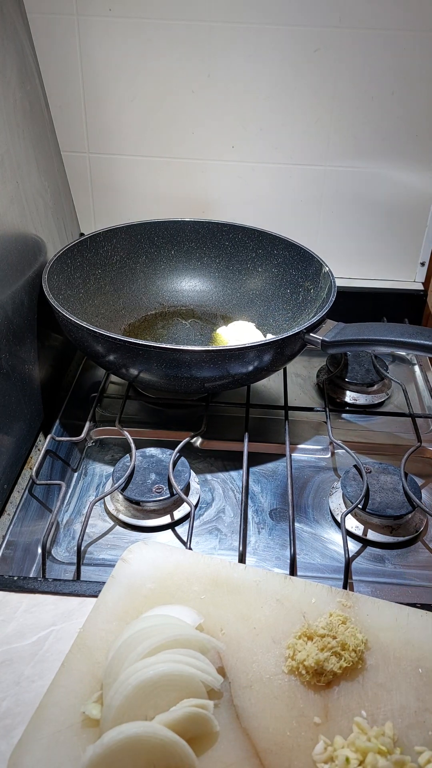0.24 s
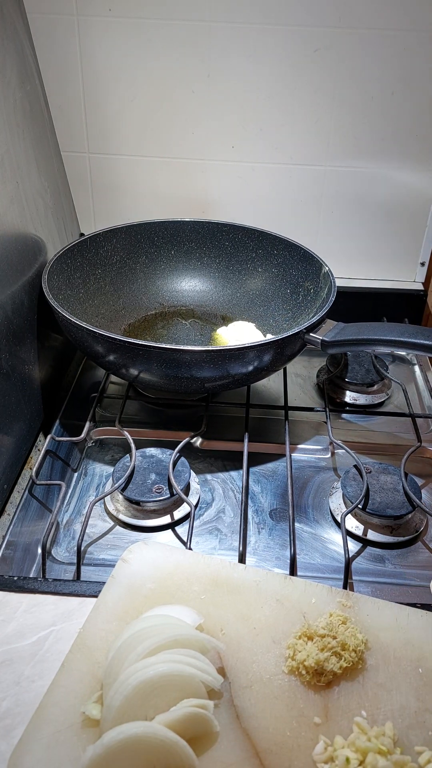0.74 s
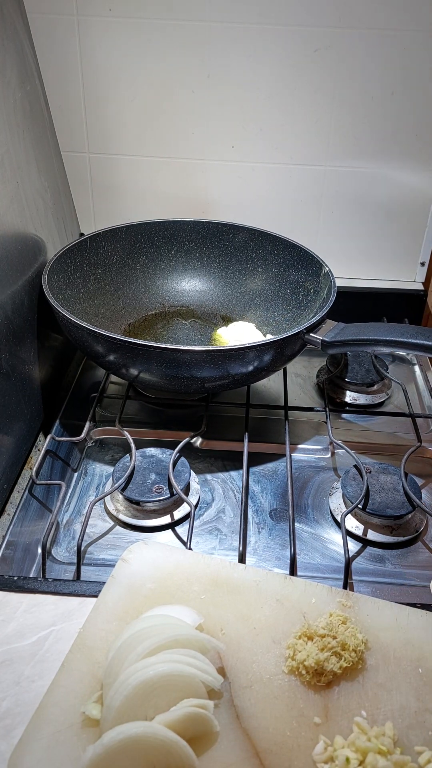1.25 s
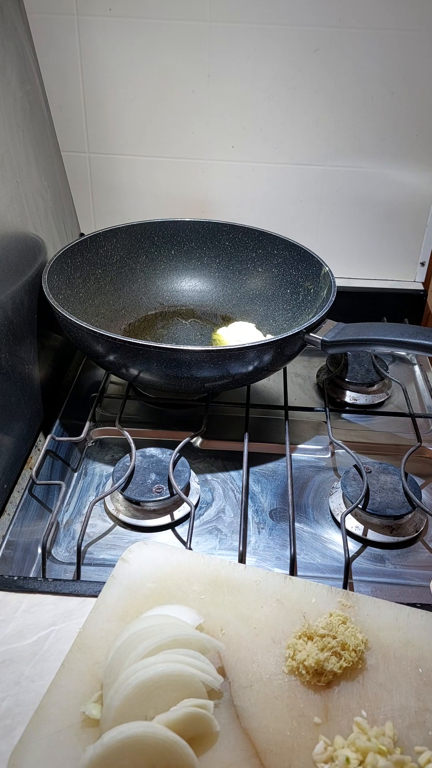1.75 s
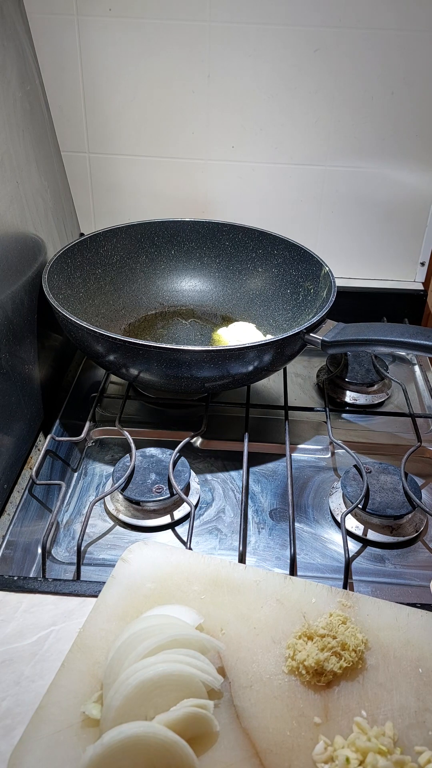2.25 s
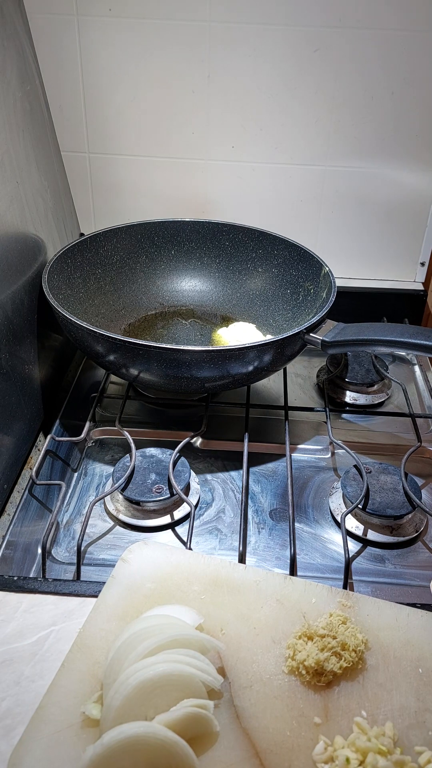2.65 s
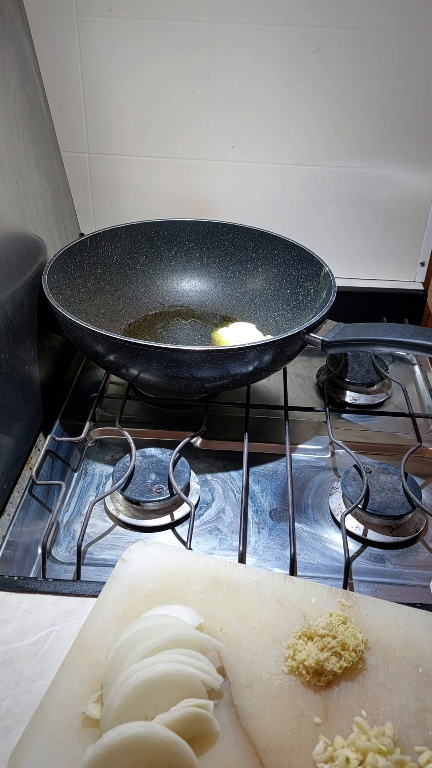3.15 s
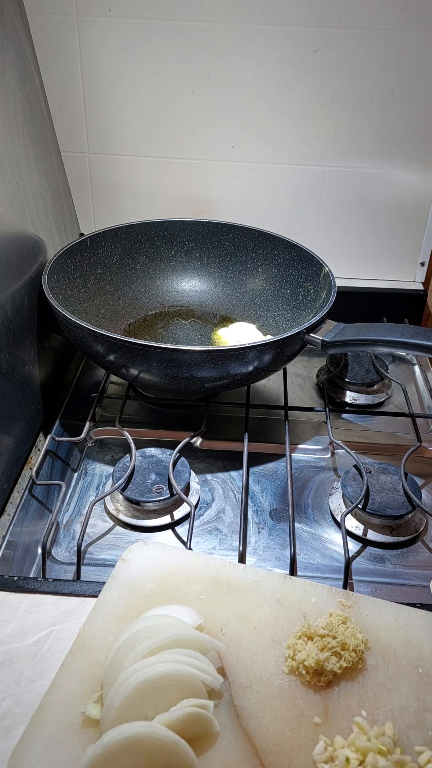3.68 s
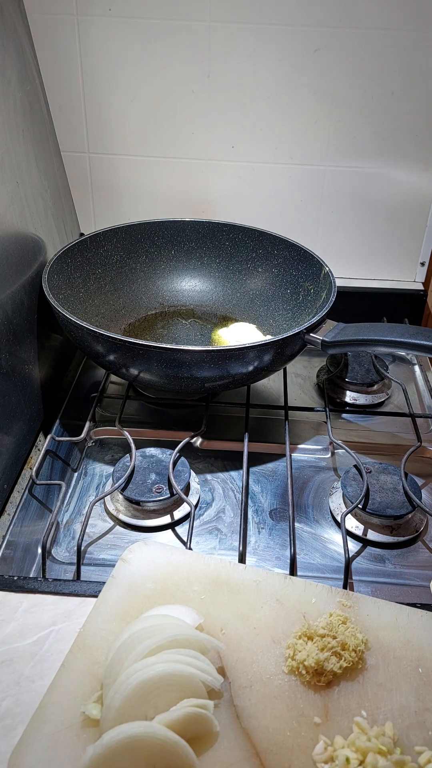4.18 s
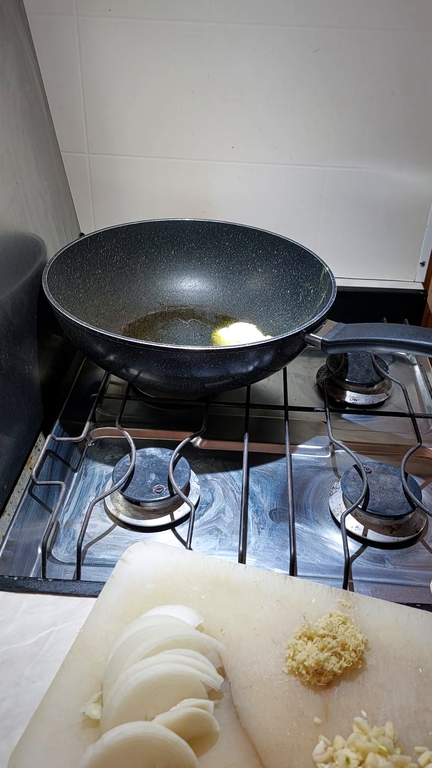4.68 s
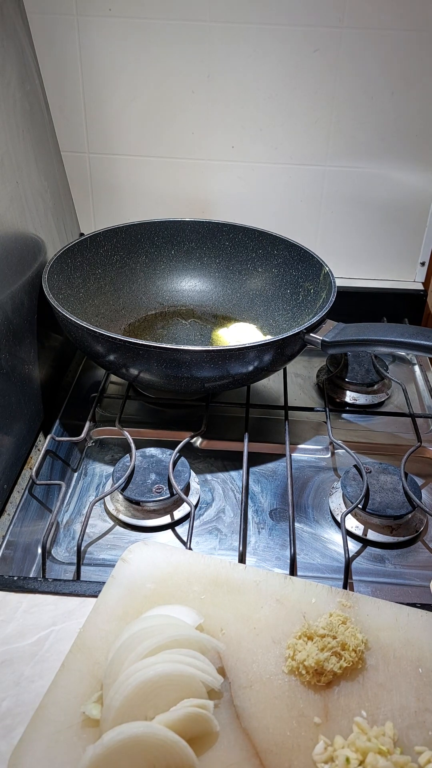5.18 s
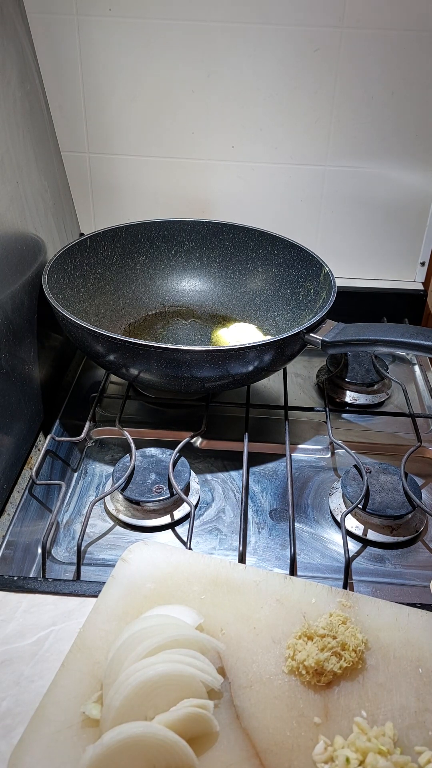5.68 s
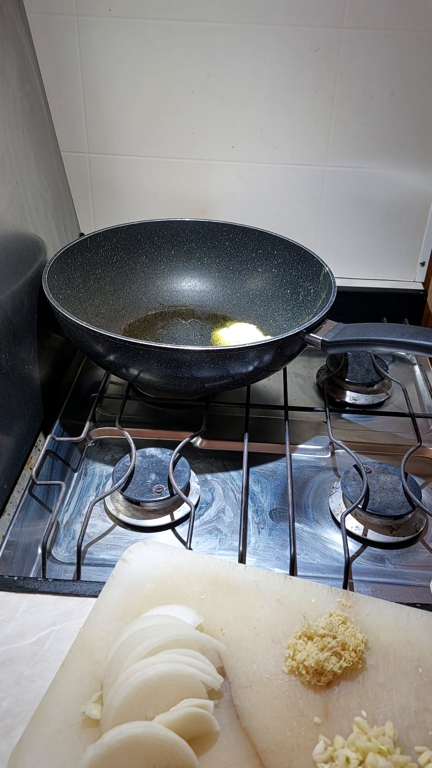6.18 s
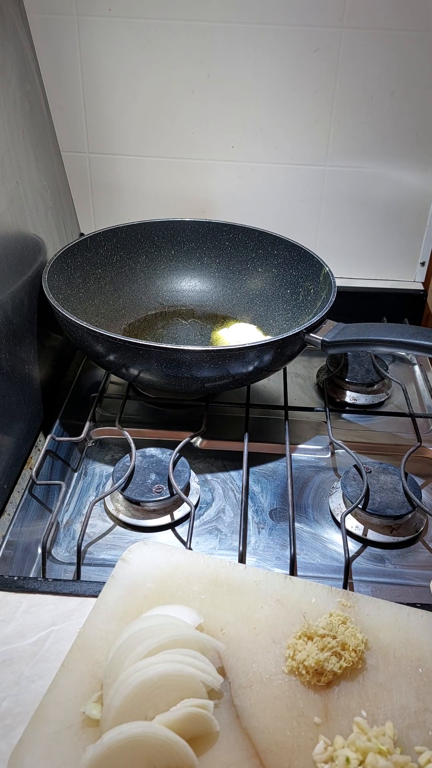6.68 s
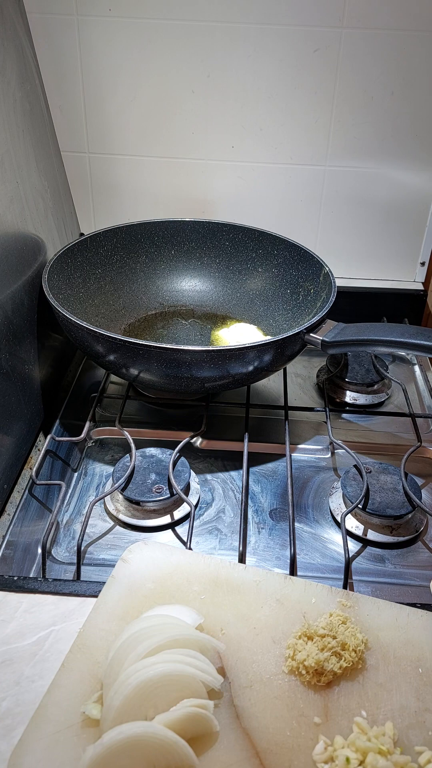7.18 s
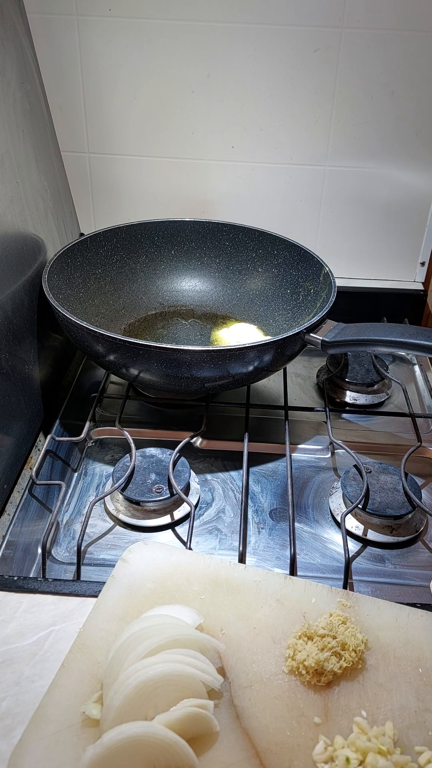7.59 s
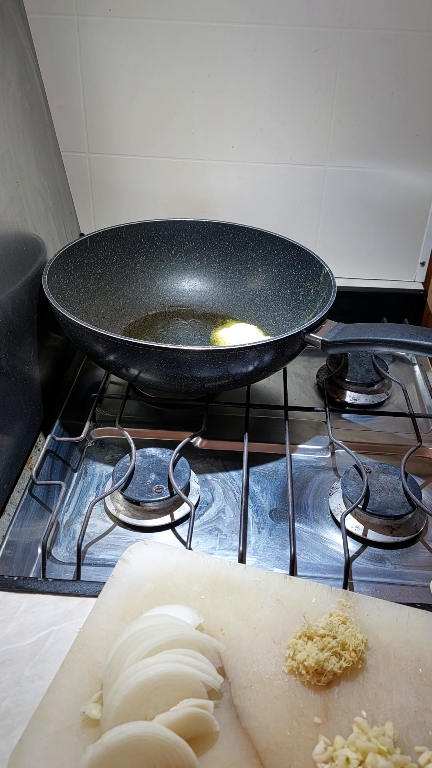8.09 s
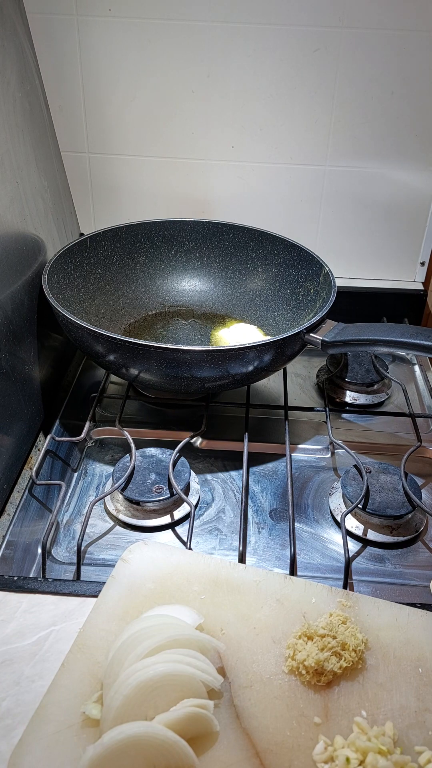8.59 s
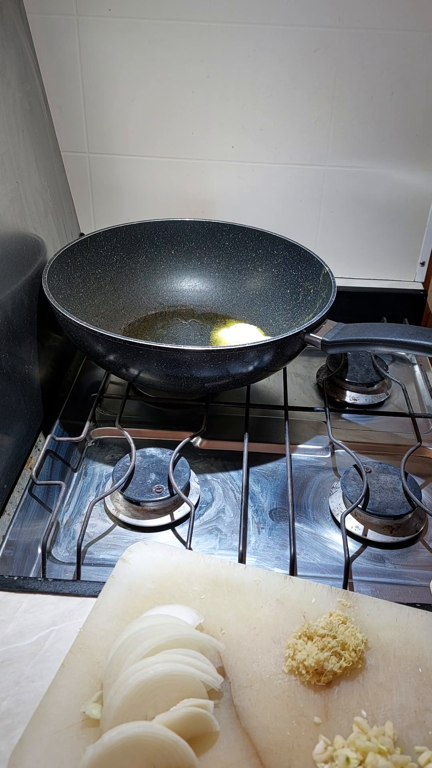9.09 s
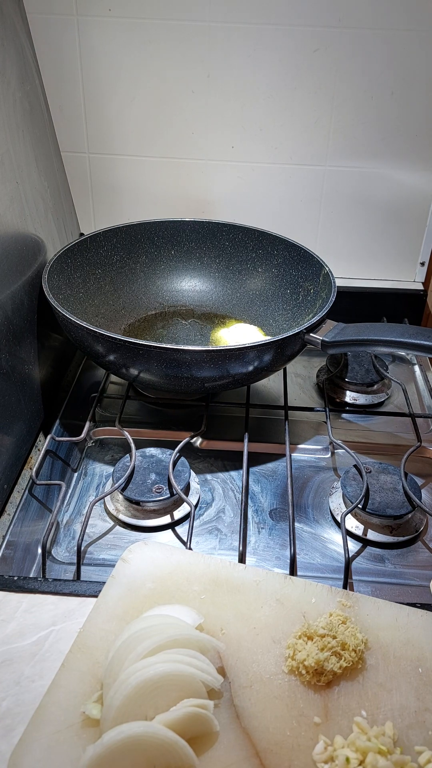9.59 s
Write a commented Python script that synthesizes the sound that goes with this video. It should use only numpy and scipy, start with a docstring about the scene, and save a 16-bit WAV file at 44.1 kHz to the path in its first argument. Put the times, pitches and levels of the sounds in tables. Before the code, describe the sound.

In a small tiled kitchen, fat sizzles and spits unevenly in a wok at left over a soft gas murmur. Something lands with quick bumps on the counter at right. Later a drawer rumbles open, utensils clatter sharply, a dish is put down, and the drawer rolls back. A clock ticks faintly. Close, spaced stereo microphones with a short room tail.

```python
"""Margarine in a wok, tiled kitchen corner

Two spaced microphones: the wok and its gas flame lie left, the counter and utensils right.
Melting fat sizzles: noise bursts fizz and spit, rising sine chirps are bubbles, shaped noise is the flame.
Something lands on the counter, a drawer rolls open, utensils clatter, a dish is put down, the drawer rolls
shut, a clock ticks faintly: decaying modes and filtered noise, with a room tail on all but drawer and flame."""
import sys
import numpy as np
from scipy import signal
from scipy.fft import rfft, irfft, next_fast_len
from scipy.io import wavfile
from scipy.ndimage import uniform_filter1d

SR = 44100
rng = np.random.default_rng(int(sys.argv[2]) if len(sys.argv) > 2 else 0)


def wrap_up_sound(samples):
    """Save the sound to the file named by the first command line argument, as 16-bit audio."""
    columns = np.atleast_2d(samples).T
    # keep every value between -1 and 1, then stretch to whole-number steps
    tamed = np.clip(columns, -1, 1)
    steps = np.round(tamed * 32767).astype(np.int16)
    wavfile.write(sys.argv[1], SR, steps)


N = 433944
T = np.arange(SR // 3) / SR  # time within one short sound, in seconds

# How hard the fat foams round the lump; it also drives the small spits.
# Each row: time in seconds, relative level in dB.
FRYING = [(0, -58), (.3, -60), (.75, -60), (1.2, -50.5), (1.65, -59), (2.25, -54.5), (2.95, -58),
          (3.3, -54), (3.6, -60), (4.4, -58.5), (4.65, -64), (5.2, -58.5), (5.65, -66.5), (5.9, -53.5),
          (7.5, -53), (8.8, -58), (9.45, -49), (9.84, -62)]
# Colour of the foam in the wok. Each row: frequency in Hz, relative level in dB.
FOAM_COLOUR = [(410, -54), (700, -6.5), (800, -7), (1300, -12.5), (2200, -5.5), (3300, -2.5), (3900, -6.5),
               (4600, 2.5), (5760, 0), (8100, -2.5), (10000, -9.5), (13000, 0.5), (16000, -12.5)]


def foam(level_db=9.0, clump_db=2.0, size_db=7, skirt_db=-5, spread_db=5.0, count=12):
    """Countless tiny bursts round the melting lump come in clumps; each size favours its own band."""
    drive = amp(along(FRYING, np.arange(N) / SR) + clump_db * wander(25))
    out = np.zeros((2, N))
    for hz in np.geomspace(700, 14000, count):
        clicks = evened(bursts(1500 / count, spread_db)) * drive
        size_colour = [(hz / 2, skirt_db), (hz, size_db), (hz * 2, skirt_db)]
        grain = colour(bowl(direct_db=-5.5), size_colour)
        out += signal.oaconvolve(grain, clicks[None], axes=1)[:, :N]
    return amp(level_db) * colour(out, FOAM_COLOUR) / np.sqrt(count)


# The loudest spits of water from the wok.
# Each row: start in seconds, body level in dB, fizz level in dB.
POPS = [(0.337, -39, -45), (0.4661, -40, -33), (0.5215, -47.5, -48.5), (0.735, -42.5, -43),
        (1.0255, -61, -51), (1.107, -35, -45), (1.3232, -40.5, -40), (1.4457, -45, -44), (1.579, -49, -42),
        (1.6016, -31.5, -26.5), (1.78, -42, -48.5), (2.0866, -55, -46), (2.4745, -47, -44),
        (2.6152, -43, -45.5), (2.702, -49, -40), (3.0694, -48, -43.5), (3.119, -40, -40),
        (3.2065, -30, -32), (3.272, -43, -40.5), (3.334, -52, -47), (3.3714, -51, -42), (3.848, -42, -36.5),
        (4.2418, -41, -42), (4.3746, -46, -46), (4.409, -34.5, -52), (4.4408, -50, -45),
        (4.7858, -42.5, -42.5), (5.1348, -35, -42.5), (5.2234, -57, -43.5), (5.8361, -41.5, -47.5),
        (5.8604, -36.5, -57), (5.9429, -48, -44), (5.9898, -35.5, -43), (6.0314, -44.5, -55),
        (6.1397, -35, -44.5), (6.201, -49.5, -40), (6.2953, -38.5, -33), (6.4453, -60, -47),
        (6.5266, -31.5, -30), (6.597, -39, -48), (6.6694, -56, -42), (6.751, -42, -53),
        (7.5176, -44.5, -40.5), (7.7337, -39, -46), (7.9425, -37, -36.5), (8.0177, -39, -43),
        (8.1355, -43.5, -44), (8.5165, -47, -41), (8.756, -34.5, -37), (9.011, -41, -39),
        (9.1524, -46.5, -44), (9.3574, -33.5, -38.5), (9.4181, -64, -43.5), (9.6449, -37.5, -64),
        (9.735, -50, -44)]


def pops():
    """Large drops of water spit out of the fat."""
    out = np.zeros((2, N))
    for s, body_db, fizz_db in POPS:
        add(out, s, spit(body_db, fizz_db))
    return out


def crackle(body_db=4, fizz_db=4, spread_db=5.5, spatter_s=0.045, count=46, size=2):
    """Smaller spits fall at random in close pairs, stronger while the fat foams harder."""
    out = np.zeros((2, N))
    pair_starts = np.repeat(rng.uniform(0, N / SR, count), size)
    times = pair_starts + rng.exponential(spatter_s, count * size)
    strengths = spread_db * rng.standard_normal((len(times), 2)).clip(-2, 1.5)
    for s, (body, fizz) in zip(times, strengths):
        add(out, s, amp(along(FRYING, s)) * spit(body_db + body, fizz_db + fizz))
    return out


# Average colour of a spit's body. Each row: frequency in Hz, relative level in dB.
SNAP_COLOUR = [(300, -22), (900, -13), (1400, -25), (2200, -11), (4000, -5.5), (7000, -5), (9500, -6.5),
               (12500, -19), (16000, -14)]


def spit(body_db, fizz_db, tear_s=0.00013, slowing=0.9, body_direct_db=-7, fizz_direct_db=0, tint_db=1.64):
    """The film over a drop tears: quickly for a bright spit, slowly for a dull one, each with its own colour."""
    dullness_db = np.clip(body_db - fizz_db, -8, 6)
    age = T[:600] / (tear_s * amp(slowing * dullness_db))
    tear = rng.standard_normal((1, len(age))) * age * np.exp(-2 * age)
    tint = [(hz, read(SNAP_COLOUR, hz) + tint_db * rng.standard_normal())
            for hz in np.geomspace(300, 16000, num=24)]
    body_path = bowl(direct_db=body_direct_db, focus_db=-16)
    body = colour(signal.fftconvolve(body_path, tear, axes=1), tint)
    fizz_path = bowl(direct_db=fizz_direct_db, focus_db=-30)
    fizz = band(signal.fftconvolve(fizz_path, tear, axes=1), 10800, 15900)
    return amp(body_db) * onset_evened(body, count=660) + amp(fizz_db) * onset_evened(fizz, count=660)


# Single larger bubbles that chirp in the wok.
# Each row: start in seconds, starting pitch in Hz, level in dB.
CHIRPS = [(0.317, 4560, -45.5), (0.511, 5800, -45), (0.579, 3860, -46.5), (0.713, 4800, -43),
          (1.032, 8900, -42), (2.184, 4630, -44), (2.261, 6600, -40), (2.387, 8700, -48.5),
          (2.431, 7350, -45.5), (2.48, 5950, -41.5), (2.83, 3430, -45), (2.986, 7060, -46.5),
          (3.299, 5830, -42.5), (3.329, 9000, -46), (3.453, 4430, -48.5), (3.698, 4350, -46.5),
          (3.755, 6030, -44.5), (3.791, 5100, -44.5), (3.823, 8900, -47), (3.861, 4600, -44.5),
          (3.972, 9040, -48.5), (4.175, 4500, -47.5), (4.288, 6150, -47.5), (4.371, 9700, -43),
          (4.445, 4820, -49), (4.813, 6060, -41), (5.008, 4950, -57), (5.13, 3600, -47), (5.352, 4080, -50),
          (5.599, 4040, -50), (5.782, 5450, -45.5), (5.859, 8800, -50), (5.867, 3380, -38.5),
          (5.891, 5960, -36), (5.987, 5410, -31.5), (6.03, 8960, -46), (6.147, 4820, -41),
          (6.201, 7060, -43.5), (6.223, 6200, -45.5), (6.33, 4440, -40.5), (6.381, 7000, -49.5),
          (6.486, 4650, -41.5), (6.642, 5760, -45.5), (6.665, 9050, -38.5), (6.689, 4770, -41),
          (6.75, 9430, -42), (6.775, 4230, -45), (6.802, 5000, -47), (7.101, 4160, -40.5),
          (7.228, 4900, -44), (7.493, 5300, -41), (7.536, 5860, -36), (7.624, 7410, -48.5),
          (7.73, 2800, -50.5), (7.738, 6850, -45), (7.776, 7500, -49), (7.882, 3480, -41.5),
          (7.913, 4440, -38.5), (7.95, 5140, -40), (7.98, 6100, -45), (8.218, 4240, -44.5),
          (8.391, 5830, -39.5), (8.512, 4560, -41.5), (8.667, 6000, -45), (8.69, 5900, -40),
          (8.906, 5450, -40.5), (9.354, 7700, -41.5), (9.384, 6900, -39), (9.497, 4100, -56)]


def chirps(twin_db=-6, twin_octaves=0.15, twin_s=0.006):
    """Larger bubbles open each at its own pitch; a quieter neighbour of nearby pitch follows at once."""
    out = np.zeros((2, N))
    for s, hz, db in CHIRPS:
        add(out, s, amp(db) * bubble(hz, ring_t60=0.0091, glide=0.045))
        twin_start = s + twin_s * (1 + rng.random())
        twin_hz = hz * 2 ** (twin_octaves * rng.standard_normal())
        add(out, twin_start, amp(db + twin_db) * bubble(twin_hz))
    return out


# How strongly bubbles rise over the pool of fat. Each row: time in seconds, relative level in dB.
SIMMER = [(0, -53), (.7, -45.5), (1.4, -55.5), (2.3, -42.5), (3.5, -76.5), (4.3, -45.5), (4.7, -56),
          (5.6, -45), (5.9, -52), (6.8, -49), (7.6, -49.5), (8.5, -40.5), (9.84, -52)]


def simmer(level_db=-5, centre_hz=6200, octaves=0.39, spread_db=3.0, clump_s=0.022, count=420, size=100):
    """Small bubbles of many sizes rise in little swarms all over the pool of fat."""
    out = np.zeros((2, N))
    pitches = centre_hz * 2 ** (octaves * rng.standard_normal(size).clip(-2, 2))
    bubbles = [bubble(hz, ring_t60=0.0045, glide=0.06) for hz in pitches]
    swarms = rng.uniform(0, N / SR, count // 3)
    times = rng.choice(swarms, count) + rng.exponential(clump_s, count)
    choices = rng.integers(0, size, count)
    strengths = rng.standard_normal(count).clip(-2, 1.5)
    for when, which, strength in zip(times, choices, strengths):
        db = level_db + along(SIMMER, when) + spread_db * strength
        add(out, when, amp(db) * bubbles[which])
    return out


def bubble(hz, ring_t60=0.0048, glide=0.18):
    """A cavity in the fat rings for a few milliseconds, rising as it opens; small ones die sooner."""
    # ring_t60 is in seconds at 5000 Hz, before a random stretch
    age = T[:900] / (ring_t60 * np.sqrt(5000 / hz) * 2 ** rng.uniform(-0.28, 1))
    chirp = amp(-60 * age) * np.sin(2 * np.pi * hz * T[:900] * (1 + glide * age))
    return onset_evened(signal.fftconvolve(bowl(direct_db=-13.0), chirp[None], axes=1))


# Pockets of water boil off in a fine high hiss that swells and sinks over the wok.
# Each row: middle in seconds, length in seconds, peak gain in dB.
STEAM = [(0.74, 0.27, -50), (1.182, 0.38, -51.5), (1.802, 0.1, -50), (2.25, 0.42, -50)]


def steam(lo_hz=10500, hi_hz=15000, grain_db=3):
    """Very dense, very small bursts merge into a hiss under smooth swells."""
    t = np.arange(N) / SR
    swell = sum(amp(db) * np.cos(np.pi * np.clip((t - s) / length, -0.5, 0.5)) for s, length, db in STEAM)
    grains = bursts(6000, spread_db=grain_db)
    hiss = signal.oaconvolve(bowl(direct_db=-25), grains[None], axes=1)[:, :N]
    return swell * evened(band(hiss, lo_hz, hi_hz))


SCATTER_T60 = 0.065  # seconds for sound scattered in the wok to fall 60 dB


def bowl(direct_db, focus_db=-10, far_db=-24, far_t60=0.39):
    """Path from one spot in the wok: straight sound, bounces across the bowl, then tiles and room."""
    decay = amp(-60 * T / SCATTER_T60) + amp(far_db - 60 * T / far_t60)
    path = evened(pair(len(T), 0.043)) * decay
    path *= 1 - np.exp(-T / 0.001)  # the scattered sound takes a moment to build up
    path /= np.linalg.norm(path[0])
    path[:, 0] += amp(direct_db) * amp([0, -7])  # the right microphone faces away
    crossing_s = rng.uniform(0.001343, 0.001666)
    for k in (1, 2):
        add(path, k * crossing_s, amp(focus_db) / k * rng.uniform(0.048, 1.0, (2, 1)))
    return placed(path, -1, right_db=rng.uniform(-0.6, 4.0))


# The drawer running out, then back: one list per run.
# Each row: time in seconds, rumble level in dB.
ROLLS = [
    [(5.6, -51.5), (5.758, -51), (5.788, -34), (6.0, -25.5), (6.196, -32), (6.426, -27), (6.48, -34.5),
     (6.522, -31.5), (6.728, -47.5), (6.774, -30), (6.916, -46.5), (6.962, -38), (7.1, -71)],
    [(8.95, -60), (9.098, -37), (9.256, -43.5), (9.382, -24.5), (9.44, -27), (9.452, -33), (9.48, -27.5),
     (9.61, -36.5), (9.724, -54), (9.746, -48.5), (9.776, -66), (9.794, -51), (9.83, -51)],
]
# Colour of the boom. Each row: frequency in Hz, relative level in dB.
RUMBLE_COLOUR = [(30, -29), (55, -14), (88, 5.5), (120, 0), (148, 4.5), (180, -9.5), (215, 0.5), (270, -21),
                 (350, -25), (600, -31.5), (1300, -37), (3000, -37.5), (8000, -92)]
# A hand takes hold of the drawer and its box hums: start and t60 in seconds.
GRASP_S, GRASP_DB, GRASP_HZ, GRASP_T60 = 5.421, -40, 202.6, 0.27


def drawer(judder_db=2.2, roll_rise_s=0.038):
    """Runners roll unevenly and the hollow cabinet booms, a little left of the middle."""
    push, t = np.zeros(N), np.arange(N) / SR
    for rows in ROLLS:
        edge_distance_s = np.minimum(t - rows[0][0], rows[-1][0] - t)
        push += amp(along(rows, t)) * np.clip(edge_distance_s / roll_rise_s, 0, 1)
    rumble = colour(pair(N, 1.0), RUMBLE_COLOUR)
    boom = push * evened(rumble * amp(judder_db * wander(40)))
    hum = ringing(GRASP_HZ, GRASP_T60, rise_s=0.0056, blur=0.033)
    add(boom, GRASP_S, amp(GRASP_DB) * hum)
    return placed(boom, -0.29, right_db=2.0)


# Utensils knocking in the drawer, off to the right. Each row: start in seconds, thud, body, clack, ring
# and click levels in dB, main ring in Hz, second ring in Hz.
CLATTER = [(6.756, -40.5, -44.5, -49, -54, -48, 2180, 3660),
           (7.1409, -54.5, -60, -37, -29, -35, 2830, 3520), (7.246, -37.5, -43, -48, -67, -64, 2350, 3440),
           (7.292, -34, -33, -29.5, -29, -44, 2317, 2172),
           (7.3478, -42, -41, -39.5, -33, -36.5, 2240, 2800),
           (7.374, -30, -36.5, -40.5, -47, -42, 2920, 3480), (7.4, -38, -41, -37, -35.5, -44, 3420, 5200),
           (7.441, -22.5, -26, -29.5, -31.5, -33.5, 2205, 1934)]
# Modes of the drawer's box and tray. Each row: frequency in Hz, level in dB, t60 in seconds.
TRAY = [(86, 1, 0.088), (168, -6.5, 0.049), (244, 6.5, 0.066), (334, 6, 0.06), (389, -10, 0.14),
        (665, 3, 0.028), (950, -0.5, 0.029), (1340, -20, .023), (1730, -1, 0.039), (2190, -10, .02),
        (2530, 0, .021), (4615, 2.5, 0.034)]


def clatter(ring_t60=0.032, second_db=-2, click_t60=0.016, scatter_db=-11, scatter_t60=0.15):
    """Each utensil clicks, rings briefly at its own two pitches, damped by its neighbours, and shakes the tray."""
    out = np.zeros((2, N))
    for s, *levels_db, ring_db, click_db, main_hz, second_hz in CLATTER:
        ring = ringing(main_hz, ring_t60, rise_s=0.00059, blur=0.056)
        ring += amp(second_db) * ringing(second_hz, ring_t60, rise_s=0.0016, blur=0.081)
        click_decay = amp(-60 * T / click_t60) + amp(scatter_db - 60 * T / scatter_t60)
        click = band(pair(len(T), 0.4) * click_decay, 3200, 14500)
        add(out, s, amp(ring_db) * onset_evened(ring) + amp(click_db) * onset_evened(click))
        add(out, s, knock(levels_db, TRAY, crack_db=6, crack_t60=0.068, rattle_db=3.5, rattle_t60=0.022,
                          tick_db=-12, tick_t60=0.18, swell_s=0.0032))
    return placed(out, 0.85, right_db=2)


# Things set down on the counter, off to the right.
# Each row: start in seconds, thud level in dB, body level in dB, clack level in dB.
THUMPS = [(0.227, -44, -65, -65), (0.398, -39, -30.5, -35), (0.406, -30, -27, -36),
          (0.418, -40, -25.5, -36), (0.4297, -25, -41, -33), (0.4328, -27.5, -25.5, -47),
          (0.459, -34, -31, -49), (0.482, -36.5, -62, -64), (0.621, -37, -37.5, -51),
          (0.627, -39, -34.5, -49), (0.648, -33.5, -47, -68)]
# Modes of the counter top. Each row: frequency in Hz, level in dB, t60 in seconds.
COUNTER = [(97, -5, 0.092), (150.7, 0, 0.093), (265, -6.5, 0.034), (346, 1.5, 0.043), (396, 3.5, 0.068),
           (467, -11, 0.073), (687.6, -1, 0.086), (914, -3.5, .07), (1297, -1, 0.044), (1780, 6, 0.032),
           (2040, -12, 0.06), (2850, -10.5, .04)]


def thumps():
    """Something lands on the counter and rattles to rest in quick, uneven bumps."""
    out = np.zeros((2, N))
    for s, *levels_db in THUMPS:
        add(out, s, knock(levels_db, COUNTER, crack_db=0, crack_t60=0.12, rattle_db=-3.5, rattle_t60=0.019,
                          tick_db=-2, tick_t60=0.042, swell_s=0.0015, touch_s=0.0013,
                          deep_hz=74.6, thud_hz=237, low_hz=1190, top_hz=3340))
    return placed(out, 0.85, right_db=0.5)


# A dish knocked and put down, between the microphones.
# Each row: start in seconds, thud level in dB, body level in dB, clack level in dB.
DISH_KNOCKS = [(7.828, -46, -47.5, -46.5), (8.328, -35, -34, -29), (8.473, -42.5, -46.5, -44)]
# Modes of the dish on its stand. Each row: frequency in Hz, level in dB, t60 in seconds.
DISH = [(169, -7, 0.19), (603, -6, 0.18), (917, -1.5, 0.055), (1340, -13, 0.053), (1700, 9, 0.068),
        (2100, 6, 0.07), (3150, 2, 0.087), (4080, 6, 0.042), (4560, -7, .1), (5570, -5, .08),
        (6750, -12, .09)]


def dish():
    """A dish is knocked, put down and rings a little."""
    out = np.zeros((2, N))
    for s, *levels_db in DISH_KNOCKS:
        add(out, s, knock(levels_db, DISH, crack_db=1.5, crack_t60=0.22, rattle_db=-4, rattle_t60=0.04,
                          tick_db=-23, tick_t60=0.18, touch_s=0.0027, low_hz=1450, top_hz=5030))
    return placed(out, 0, right_db=1.5)


def knock(levels_db, modes, crack_db, crack_t60, rattle_db, rattle_t60, tick_db, tick_t60, swell_s=0.005,
          touch_s=0.00089, deep_hz=85, thud_hz=400, low_hz=1900, top_hz=4800):
    """A firm blow with a little rattle drives the modes; its thud, body and clack are levelled apart."""
    ring = 0
    for hz, db, t60 in modes:
        phase = rng.normal(0, min(hz / 1500, 2), (2, 1))  # the microphones agree best at low pitch
        ring = ring + amp(db - 60 * T / t60) * np.sin(2 * np.pi * hz * T + phase)
    contact = rng.standard_normal(len(T)) * amp(-60 * T / rattle_t60)
    contact *= amp(rattle_db) / np.linalg.norm(contact)
    contact[0] += 1  # the blow itself
    hit = onset_evened(signal.fftconvolve(ring, contact[None], axes=1)[:, :len(T)])
    hit += amp(crack_db) * onset_evened(pair(len(T), 0.2) * amp(-60 * T / crack_t60))
    slow_hit = hit * (1 - np.exp(-T / swell_s))  # heavy panels start slowly
    thud = band(band(slow_hit, deep_hz, thud_hz), deep_hz, thud_hz)
    body = band(hit, 290, 1110)
    tick = onset_evened(band(pair(len(T), 0.31), 1600, 11400) * amp(-60 * T / tick_t60))
    clack = onset_evened(band(hit, low_hz, top_hz)) + amp(tick_db) * tick
    touch = 1 - np.exp(-T / touch_s)
    return sum(amp(db) * onset_evened(part * touch, count=1100)
               for db, part in zip(levels_db, (thud, body, clack)))


# Loose things slide and rustle, off to the right.
# Each row: start in seconds, length in seconds, starting gain in dB.
SLIDES = [(6.73, 0.056, -42.5), (7.282, 0.203, -36.5), (8.464, 0.056, -43.5), (9.289, 0.24, -41)]


def slides(lo_hz=650, hi_hz=4000, rise_s=0.009, fade_db=-16, grain_db=4):
    """Many tiny catches make a dry rasp that starts with a shove and dies away."""
    out = np.zeros((2, N))
    catch_strength = uniform_filter1d(bursts(1800, grain_db), 60)
    catches = evened(band(pair(N, 0.13) * catch_strength, lo_hz, hi_hz))
    for s, length, db in SLIDES:
        t = np.arange(0, length, 1 / SR)
        edges = np.clip(np.minimum(t, length - t) / rise_s, 0, 1)
        shove = edges * amp(db + fade_db * t / length)
        add(out, s, shove * catches[:, round(s * SR):][:, :len(t)])
    return placed(out, 0.8, right_db=1.5)


# The wall clock's hand steps, then settles.
# Each row: start in seconds, then relative step, settling and gear ring levels in dB.
TICKS = [(1.385, -48.5, -59, -54.5), (2.385, -55, -53, -51), (3.385, -51.5, -54, -54),
         (4.384, -60, -54.5, -52), (5.385, -50.5, -51.5, -54), (6.384, -56, -50.5, -51),
         (8.383, -55, -49, -48.5), (9.386, -48, -60, -68)]


def clock(case_hz=555, case_t60=0.25, settle_s=0.039, gear_hz=2740, gear_t60=0.13,
          shake_db=1, rattle_db=2, level_db=-2.5):
    """The hand steps and shakes the hollow case, then settles with a rattle and a small ring of the gears."""
    out = np.zeros((2, N))
    for s, step_db, settle_db, gear_db in TICKS:
        for delay_s, db in ((0, step_db), (settle_s, settle_db)):
            shake = onset_evened(band(pair(len(T), 0.81) * amp(-60 * T / case_t60), 220, 676))
            case = ringing(case_hz, case_t60, rise_s=0.0013, blur=0.08)
            add(out, s + delay_s, amp(db) * (case + amp(shake_db) * shake))
        rattle = band(pair(len(T), 0.33), 720, 4000) * amp(-60 * T / 0.093)
        rattle = onset_evened(rattle * (1 - np.exp(-T / 0.018)))
        gears = ringing(gear_hz, gear_t60, rise_s=0.003, blur=0.037)
        add(out, s + settle_s, amp(gear_db) * (gears + amp(rattle_db) * rattle))
    return amp(level_db) * out


def ringing(hz, t60, rise_s, blur, count=5):
    """A cluster of close modes swells and dies; each reaches the microphones in its own phase."""
    modes = 0
    for k in rng.uniform(-0.81, 1, count):
        cycles = hz * (1 + blur * k) * T + rng.random()
        phase = rng.normal(0, min(hz / 1500, 2), (2, 1))
        modes = modes + np.sin(2 * np.pi * cycles + phase)
    return onset_evened(modes * amp(-60 * T / t60) * (1 - np.exp(-T / rise_s)))


# Colour of the gas flame under the wok. Each row: frequency in Hz, relative level in dB.
FLAME_COLOUR = [(15, -37), (25, -18), (64, 1), (96, 0), (212, -4), (289, -15), (393, -15), (535, -23.5),
                (674, -19), (1300, -35), (1600, -34), (2230, -18.5), (2500, -51), (3250, -42), (5500, -120)]


def flame(level_db=-57, flutter_db=-1.0):
    """Low murmur of the burner on the left: shaped noise with a fluttering level."""
    murmur = evened(colour(pair(N, 0.94), FLAME_COLOUR))
    return amp(level_db + flutter_db * wander(11.0)) * placed(murmur, -0.59, right_db=-3.5)


# How long the small room rings on. Each row: frequency in Hz, t60 in seconds.
KITCHEN_T60 = [(100, 0.47), (500, 0.24), (2000, 0.16), (6000, 0.14), (16000, 0.15)]


def kitchen(x):
    """Diffuse tail of the small room, each band dying at its own speed."""
    hz, t, z = signal.stft(rng.standard_normal((2, SR // 2)), SR, nperseg=256)
    decay = amp(-60 * t / read(KITCHEN_T60, hz)[:, None]) * (1 - np.exp(-t / 0.00033))
    tail = signal.istft(z * decay, SR, nperseg=256)[1]
    return signal.oaconvolve(x, tail / np.linalg.norm(tail[0]), axes=1)[:, :N]


SPACING_S = 0.00052  # longest delay between the two microphones, in seconds


def placed(x, side, right_db=0):
    """Sound from one side (-1 left .. 1 right) reaches the far microphone later."""
    lag = round(min(abs(side), 1) * SPACING_S * SR)
    delays = (lag, 0) if side > 0 else (0, lag)
    delayed = np.array([np.pad(v, (d, 0))[:len(v)] for v, d in zip(x, delays)])
    return delayed * amp([[-right_db / 2], [right_db / 2]])


def pair(size, same):
    """Noise at two microphones that hear partly the same."""
    shared, same = rng.standard_normal(size), np.clip(same, 0, 1)
    return np.sqrt(same) * shared + np.sqrt(1 - same) * rng.standard_normal((2, size))


def bursts(per_s, spread_db):
    """Random clicks, mostly small and a few large."""
    return (rng.random(N) < per_s / SR) * amp(spread_db * np.minimum(rng.exponential(1, N), 4))


def wander(per_s):
    """Random curve: straight lines between normal random knots, per_s of them each second."""
    knots = rng.standard_normal(4096)
    return np.interp(np.arange(N) / SR * per_s, np.arange(len(knots)), knots)


def amp(db):
    """Decibels to gain."""
    return 10 ** (np.asarray(db) / 20)


def evened(x):
    """Scales to rms 1."""
    return x / np.sqrt(np.mean(x ** 2) + 1e-20)


def onset_evened(x, count=900):
    """Scales a hit to rms 1 over its first samples."""
    return x / np.sqrt(np.mean(x[:, :count] ** 2) + 1e-20)


def along(curve, s):
    """Value of a control curve at the given times."""
    return np.interp(s, *np.transpose(curve))


def read(points, hz):
    """Value of a spectrum on a log-frequency axis."""
    f, value = np.transpose(points)
    return np.interp(np.log(hz + 1), np.log(f + 1), value)


def add(mix, s, sound):
    """Mixes a sound in at the given time."""
    part = mix[:, max(round(s * SR), 0):][:, :sound.shape[1]]
    part += sound[:, :part.shape[1]]


def colour(x, points):
    """Causal (minimum-phase) filter with the given spectrum."""
    size = next_fast_len(x.shape[-1] + 2048)
    log_gain = np.log(amp(read(points, abs(np.fft.fftfreq(size, 1 / SR)))))
    response = np.exp(np.conj(signal.hilbert(log_gain)))[:size // 2 + 1]
    return irfft(rfft(x, size) * response, size)[..., :x.shape[-1]]


def band(x, lo_hz, hi_hz):
    """Gentle band-pass."""
    sos = signal.butter(2, [lo_hz, min(hi_hz, SR / 2 - 1)], "band", fs=SR, output="sos")
    return signal.sosfilt(sos, x)


def scene():
    """The wok on the left, the drawer, and the kitchen work and clock with their room tail."""
    wok = pops() + chirps() + crackle() + foam() + steam() + simmer() + flame()
    work = thumps() + clatter() + slides() + dish() + clock()
    return wok + drawer() + work + amp(-8.0) * kitchen(work)


# How the two microphones differ in colour. Each row: frequency in Hz, left minus right in dB.
EAR_TILT = [(100, -1.5), (400, 1), (2200, 1), (4500, 0.5), (8000, 4.5), (12000, 3), (16000, -1)]
EDGE_HZ = 16100  # upper band limit


def record(dry):
    """The two microphones differ a little in colour; then the band limit."""
    sides = [colour(x, [(hz, sign * db / 2) for hz, db in EAR_TILT]) for x, sign in zip(dry, (1, -1))]
    low_pass = signal.firwin(255, EDGE_HZ, window=("kaiser", 8), fs=SR)
    return signal.oaconvolve(np.array(sides), low_pass[None], "same")


dry = scene()
out = record(dry)
wrap_up_sound(out)
```